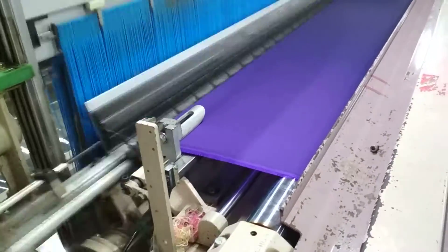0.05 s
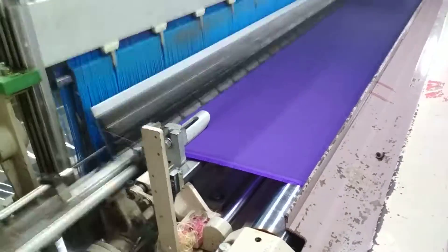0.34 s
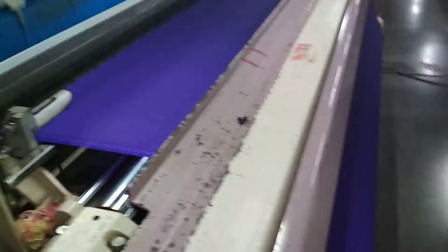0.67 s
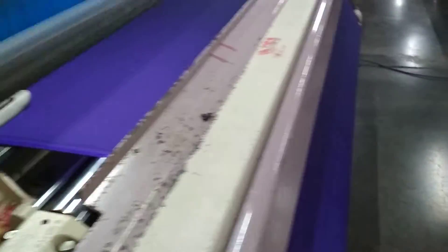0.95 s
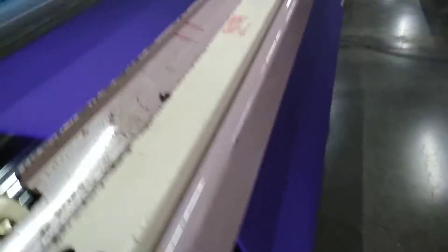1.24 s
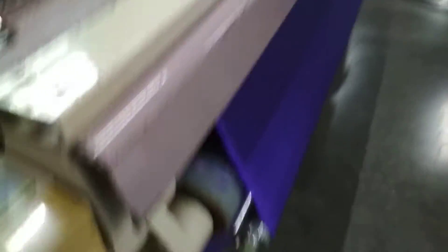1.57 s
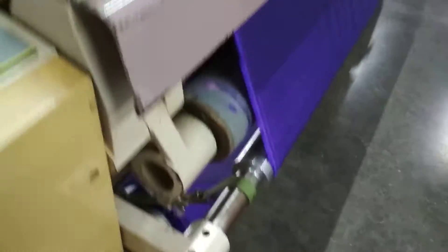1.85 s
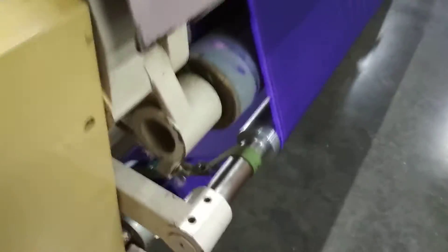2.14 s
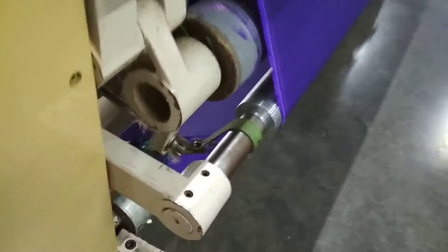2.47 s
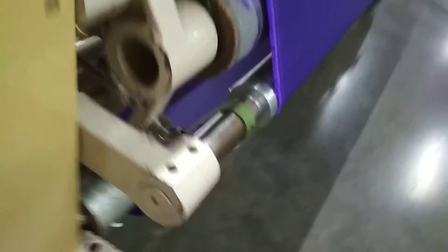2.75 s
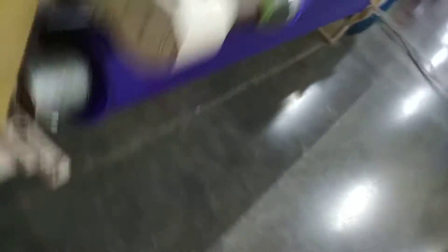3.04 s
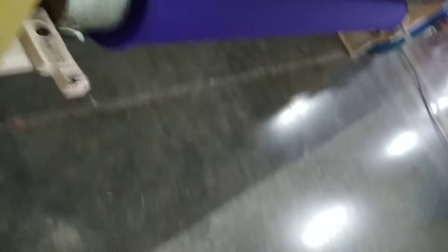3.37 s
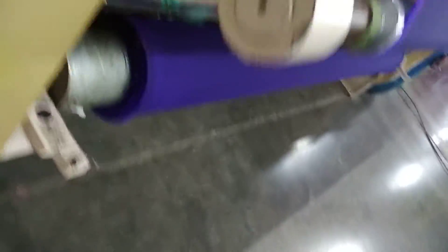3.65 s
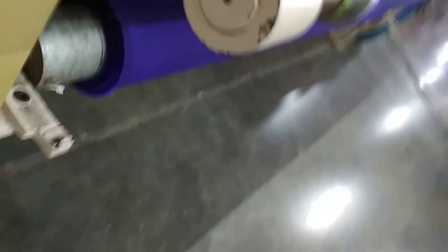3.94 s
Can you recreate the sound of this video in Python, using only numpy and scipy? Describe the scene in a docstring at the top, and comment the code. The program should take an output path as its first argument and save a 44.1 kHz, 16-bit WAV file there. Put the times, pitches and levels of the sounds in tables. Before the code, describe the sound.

Fast, steady loom clatter over a dense machine roar and air hiss in a factory hall.

```python
"""A loom at arm's length in a weaving hall, its blows thumping through the frame ten times a second.
Its clatter has brief chance peaks. As the microphone sinks beside the frame, the rumble of cams, levers
and gears swells and fills the gaps. Farther off, many other looms, each at its own speed, clatter
into the hall's long echo and merge into a roar. Drives hum underneath; air jets hiss steadily on top."""
import sys
import numpy as np
from scipy import signal
from scipy.fft import rfft, irfft
from scipy.io import wavfile
from scipy.ndimage import uniform_filter1d, map_coordinates

SR = 44100
rng = np.random.default_rng(int(sys.argv[2]) if len(sys.argv) > 2 else 0)


def bounce(signal):
    """Save signal as a 16-bit WAV file at the path given by the first command-line argument."""
    frames = np.transpose(np.atleast_2d(signal))
    limited = np.clip(frames, -1, 1)
    pcm = np.round(limited * 32767).astype(np.int16)
    wavfile.write(sys.argv[1], SR, pcm)


N = 176400

# blows in each turn of the near loom: start_s (within the turn), level_db, decay_s
TURN_BLOWS = [(.002, 0, .013), (.015, 0, .014), (.029, -1.5, .015), (.047, -6, .016)]
# body response of the near loom: frequency_hz, gain_db
FRAME_RESPONSE = [(25, -38), (45, -11), (60, -6.5), (110, 0), (160, -3), (270, 1.5), (350, 0), (420, -5.5),
                  (530, -5), (680, -20.5), (1100, -31.5), (2500, -42.5)]
# its strokes, strongest beside the front beam: time_s, level_db
STROKE_LEVEL = [(0, -28), (.8, -27), (1.1, -24.3), (1.5, -23), (2.2, -23.5), (2.8, -25), (3.4, -27),
                (4, -27)]
# its works, louder as the microphone sinks: time_s, level_db
WORKS_LEVEL = [(0, -25.5), (.8, -25), (1.3, -25.5), (1.8, -25), (2.3, -24.5), (2.8, -21.5), (3.3, -20),
               (4, -19.5)]
# its resonant panels: pitch_hz, width_hz, nearest_s, half_passing_s, level_db
PANEL_RESONANCES = [(170, 100, .15, .6, -29.5), (527, 280, 2.47, 0.57, -27), (214, 107, 3.3, 0.95, -32),
                    (345, 145, 3.55, .6, -25), (92.5, 40, 3.7, 1.2, -28.5)]
# its bass, gathering by the floor: frequency_hz, gain_db
FLOOR_RESPONSE = [(30, -16), (60, -5), (85, -5), (120, -24), (300, -53)]
# how much of that bass reaches the microphone: time_s, gain_db
FLOOR_GAIN = [(0, -13), (2.8, -22), (3.3, -8), (3.6, 7), (4, -16)]
# brief chance peaks in its clatter: start_s, level_db
CLATTER_PEAKS = [(.122, -15), (.349, -11), (.534, -9), (.594, -12), (.697, -14), (.920, -14.5),
                 (1.007, -13), (1.100, -13), (1.229, -13), (1.316, -17), (1.424, -14), (1.518, -12),
                 (1.717, -14), (1.911, -13), (1.942, -15), (2.130, -10), (2.426, -13), (2.556, -11),
                 (2.633, -16), (2.762, -9), (2.944, -12), (3.189, -9), (3.463, -9), (3.640, -10),
                 (3.749, -12), (3.862, -11), (3.947, -15)]
# short modes of its frame: pitch_hz, level_db, t60_s
FRAME_MODES = [(165, -10.5, 0.069), (219.5, -4, 0.068), (267, -0.5, 0.087), (347.4, -1, .07),
               (422, -2, 0.038), (502, -2, 0.033)]
# roar of the distant looms: frequency_hz, gain_db
ROAR_SPECTRUM = [(20, -21), (33, -11), (48, -14), (60, -8.5), (110, -1), (160, -1.5), (270, -2),
                 (420, -1.6), (560, -2.5), (670, -3.5), (1000, -5), (1500, -6), (2000, -10.5),
                 (2500, -17.5), (2800, -24.5), (3200, -33), (4500, -36)]
# likeness of the roar left and right: frequency_hz, correlation
ROAR_LIKENESS = [(30, 0.78), (70, 0.47), (300, 0.55), (480, 0.39), (700, 0.28), (1000, 0.09),
                 (1400, -0.072), (3000, -0.025)]
# lean of the roar: frequency_hz, left_over_right_db
ROAR_LEAN = [(300, -0.3), (800, 0.2), (1600, 1.5), (2500, 2)]
# hum of shafts and drives: pitch_hz, start_level_db, end_level_db
SHAFT_TONES = [(59.46, -38, -38), (99.7, -39, -38), (129.4, -33.5, -33), (176.9, -38.5, -39.5),
               (262.8, -41, -31.5), (267, -30, -36.5), (284.5, -40, -36.5)]
# the strongest drive tone: time_s, level_db
DRONE_LEVEL = [(0, -32), (1.2, -29), (1.5, -44), (1.7, -28.5), (2.4, -30), (2.85, -26), (3.2, -27.5),
               (3.6, -33), (4, -32)]
# hiss of the air jets: frequency_hz, left_db, right_db
AIR_SPECTRUM = [(1500, -34, -20), (3230, -13, -15), (4400, -11, -10), (7240, -8, -9.5), (7950, -6.7, -5.5),
                (9660, -2.5, -4.5), (10640, -1.5, 1), (11500, 0, 2.5), (13100, -0.7, -2), (14000, -3, -3),
                (16000, -5.5, -7)]
# drift of the machines as the microphone turns: time_s, left_over_right_db
MIC_TURN = [(0, 0.23), (1.2, 0.38), (2.2, -0.23), (4, -0.89)]
# treble shading low beside the loom: frequency_hz, gain_db
LOOM_SHADE = [(700, 0), (1800, -1), (3000, -1), (5500, -1.2), (8500, -2.5), (11000, -0.5), (15000, 1.5)]

TURN_HZ, FIRST_TURN_S, NEAR_LIKENESS = 9.83, .078, .85
BLOW_JITTER_S, BLOW_SCATTER_DB = .0003, 1.06


def near_loom():
    """Close up, strokes and works sound through the frame and panels; bass gathers by the floor."""
    thumps = level(colour(stereo(strokes(), NEAR_LIKENESS), FRAME_RESPONSE), 0)
    rumble = level(colour(stereo(works(), NEAR_LIKENESS), FRAME_RESPONSE), 0)
    body = thumps * undb(curve(STROKE_LEVEL)) + rumble * undb(curve(WORKS_LEVEL))
    boom = undb(curve(FLOOR_GAIN)) * equalise(body, by_hz(FLOOR_RESPONSE))
    return body + boom + panels(stereo(works(), NEAR_LIKENESS))


def strokes(rattle_share=.4):
    """Each blow rings the frame the same way on every turn and shakes loose parts that rattle anew."""
    t = np.arange(N) / SR
    rings, shake = 0, 0
    for start_s, db, decay_s in TURN_BLOWS:
        pushes = undb(db) * strikes(TURN_HZ, FIRST_TURN_S + start_s, BLOW_JITTER_S, BLOW_SCATTER_DB)
        fade = np.exp(-t / decay_s)
        rings = rings + ring(pushes, fade * rng.standard_normal((2, N)))
        shake = shake + ring(pushes ** 2, fade ** 2)
    rattle = np.sqrt(abs(shake)) * rng.standard_normal((2, N))
    return np.sqrt(1 - rattle_share) * level(flatten(rings), 0) + np.sqrt(rattle_share) * level(rattle, 0)


def works(count=9, decay_s=.04):
    """Cams, levers and gears tap all round the turn; their rings overlap into a sustained rumble."""
    fade = np.exp(-np.arange(N) / SR / decay_s)
    taps = 0
    for k in range(count):
        first_s = (k + rng.random()) / count / TURN_HZ
        pushes = strikes(TURN_HZ, first_s, jitter_s=.0015, scatter_db=1)
        taps = taps + ring(pushes, fade * rng.standard_normal((2, N)))
    return flatten(taps)


def panels(taps):
    """Covers and hollows of the loom resonate; each stands out while the microphone passes it."""
    t, f = np.arange(N) / SR, np.fft.rfftfreq(N, 1 / SR) + 1
    out = 0
    for hz, width_hz, nearest_s, half_passing_s, db in PANEL_RESONANCES:
        resonance = 1 / (1 + 1j * (f ** 2 - hz ** 2) / (f * width_hz))
        ringing = irfft(rfft(taps) * resonance ** 2, N)
        out = out + level(ringing, db) / (1 + ((t - nearest_s) / half_passing_s) ** 2)
    return out


def clatter_peaks(attack_s=.0029, pitch_spread=.044, mix_spread_db=1.5):
    """Brief chance peaks in the near loom's clatter, played as short low rings in a new mix each time."""
    t = np.arange(SR // 10) / SR
    hz, mode_db, t60_s = np.array(FRAME_MODES).T[:, :, None]
    out = np.zeros(N + len(t))
    for start_s, db in CLATTER_PEAKS:
        detune, mix, phase = rng.standard_normal((3, len(hz), 1))
        swing = np.sin(2 * np.pi * (hz * (1 + pitch_spread * detune) * t + phase))
        modes = undb(mode_db + mix_spread_db * mix) * np.exp(-np.log(1000) * t / t60_s) * swing
        low_ring = modes.sum(0) * (1 - np.exp(-t / attack_s))
        start = int(start_s * SR)
        out[start:start + len(t)] += undb(db) * low_ring / abs(low_ring).max()
    return out[:N]


def distant_looms(count=24, speed_spread=.035, clack_s=.0038, direct_db=-9, hall_t60_s=1.27):
    """Looms across the hall, each at its own speed: every clack arrives directly, then as a long echo."""
    t = np.arange(N) / SR
    direct = level(np.exp(-t / clack_s), direct_db)
    echo = level(np.exp(-np.log(1000) * t / hall_t60_s), 0)
    fade = np.hypot(direct, echo)
    clatter = 0
    for _ in range(count):
        hz = TURN_HZ * (1 + speed_spread * rng.standard_normal())
        pushes = strikes(hz, rng.random() / hz, jitter_s=.0005, scatter_db=BLOW_SCATTER_DB)
        clatter = clatter + ring(pushes, fade * rng.standard_normal((2, N)))
    roar = colour(stereo(flatten(clatter), by_hz(ROAR_LIKENESS)), ROAR_SPECTRUM)
    lean_db = by_hz(ROAR_LEAN)
    return level(equalise(roar, np.array([lean_db, -lean_db]) / 2), db=-16.5)


def drives(drone_hz=196.6):
    """Tones of shafts and motors swell and waver as the microphone moves among them."""
    shafts = sum(level(hum_tone(hz), np.linspace(start_db, end_db, N))
                 for hz, start_db, end_db in SHAFT_TONES)
    return shafts + level(hum_tone(drone_hz), curve(DRONE_LEVEL))


def hum_tone(hz, waver_db=1.5, waver_rad=.36):
    """One drive tone, wavering a little, differently on each side of the microphone."""
    phase = 2 * np.pi * (hz * np.arange(N) / SR + rng.random()) + waver_rad * wander(2.62)
    swell = undb(waver_db * wander(2.82))
    return swell * np.sin(phase + waver_rad * np.array([wander(1.98), wander(1.97)]))


def air_jets():
    """Air jets all over the hall blend into one smooth hiss, unrelated left and right."""
    hz, *sides = np.array(AIR_SPECTRUM).T
    hiss = np.array([colour(rng.standard_normal(N), np.c_[hz, db]) for db in sides])
    return level(hiss, db=-28)


def strikes(rate_hz, first_s, jitter_s, scatter_db):
    """One push per turn, each a little off in time and strength; sample N is time zero."""
    timing, strength = rng.standard_normal((64, 2)).T
    turns = np.arange(len(timing)) - N / SR * 5  # the loom is already running at time zero
    at = np.round((turns / rate_hz + first_s + jitter_s * timing) * SR).astype(int) + N
    inside = (at >= 0) & (at < 2 * N)
    return np.bincount(at[inside], undb(scatter_db * strength[inside]), 2 * N)


def ring(pushes, response):
    """Let pushes excite a response; keep what sounds from time zero on."""
    return irfft(rfft(pushes) * rfft(response, 2 * N))[..., N:]


def flatten(x, bins=240):
    """Flatten the broad bumps in the spectrum of a random ring and keep its fine modes."""
    spectrum = rfft(x)
    return irfft(spectrum / np.sqrt(uniform_filter1d(abs(spectrum) ** 2, bins, axis=-1)), N)


def colour(x, rows):
    """Minimum-phase filter through (frequency_hz, gain_db) points."""
    cepstrum = irfft(np.log(undb(by_hz(rows))), N)
    fold = np.r_[1, np.full(N // 2 - 1, 2), np.zeros(N - N // 2)]
    return irfft(rfft(x) * np.exp(rfft(cepstrum * fold)), N)


def equalise(x, gain_db):
    """Zero-phase filter with a gain for every frequency."""
    return irfft(rfft(x) * undb(gain_db), N)


def stereo(pair, likeness):
    """Blend two unrelated signals into left and right with the given correlation."""
    mid, side = rfft(pair[0]) * np.sqrt(1 + likeness), rfft(pair[1]) * np.sqrt(1 - likeness)
    return irfft(np.array([mid + side, mid - side]), N)


def wander(rate_hz):
    """A smooth random drift with a spread near 1."""
    return map_coordinates(rng.standard_normal(256), [np.arange(N) / SR * rate_hz], mode="mirror")


def curve(rows):
    """Join (time_s, value) points by straight lines."""
    return np.interp(np.arange(N) / SR, *np.array(rows).T)


def by_hz(rows):
    """Read (frequency_hz, value) points at every frequency of a spectrum."""
    hz, value = np.array(rows).T
    return np.interp(np.log(np.fft.rfftfreq(N, 1 / SR) + 1), np.log(hz), value)


def level(x, db):
    """Set the rms level."""
    return x * undb(db) / np.sqrt(np.mean(x ** 2))


def undb(db):
    """Decibels to amplitude."""
    return 10 ** (np.asarray(db) / 20)


def scene(sink_start_s=.55, sink_end_s=2.8):
    """The machines drift slightly right as the microphone turns; as it sinks, the loom shades treble."""
    machines = near_loom() + clatter_peaks() + distant_looms() + drives()
    lean_db = curve(MIC_TURN)
    hall = machines * undb(np.array([lean_db, -lean_db]) / 2) + air_jets()
    sunk = curve([(sink_start_s, 0), (sink_end_s, 1)])
    return (1 - sunk) * hall + sunk * equalise(hall, by_hz(LOOM_SHADE))


def record(dry):
    """The recorder rounds the highest peaks and cuts the top."""
    ceiling, top_hz = .85, 15750
    rounded = dry / (1 + (dry / ceiling) ** 8) ** (1 / 8)
    return signal.sosfilt(signal.ellip(12, .1, 80, top_hz, fs=SR, output="sos"), rounded)


dry = scene()
out = record(dry)
bounce(out)
```